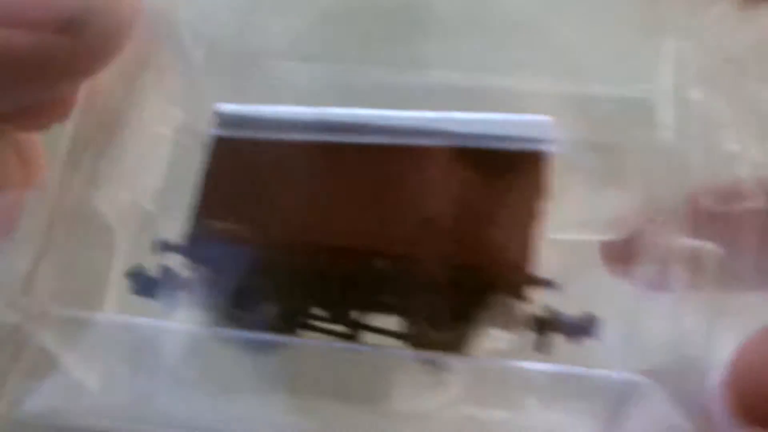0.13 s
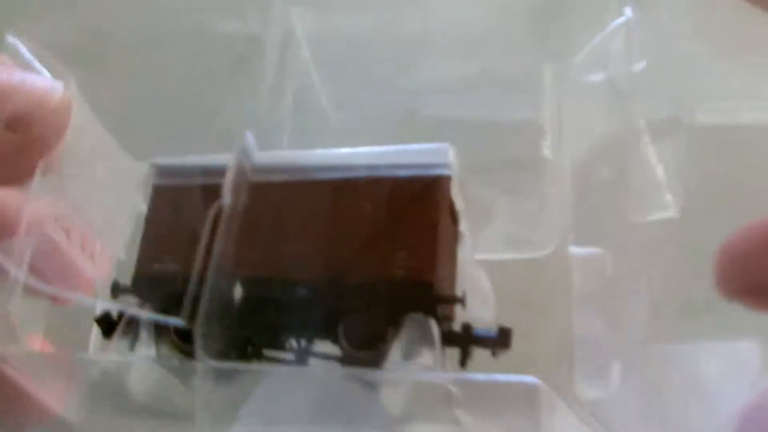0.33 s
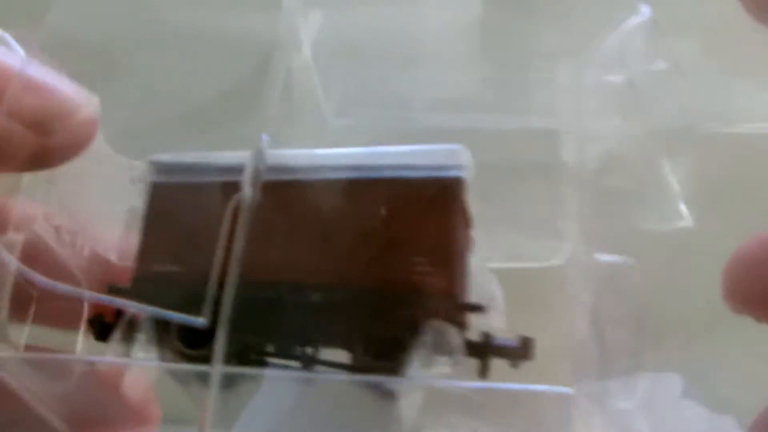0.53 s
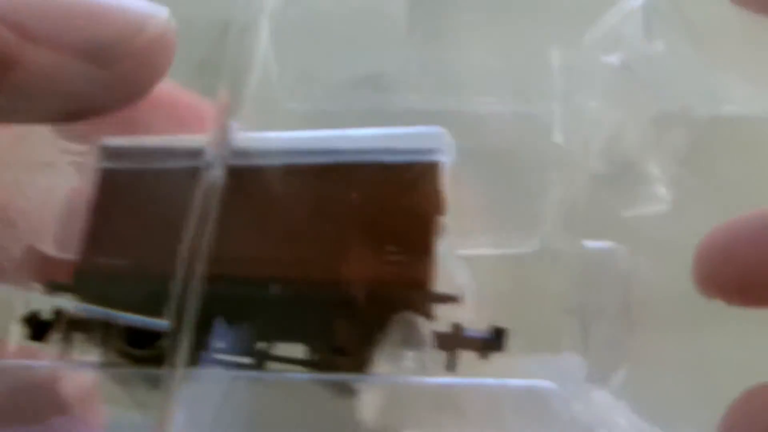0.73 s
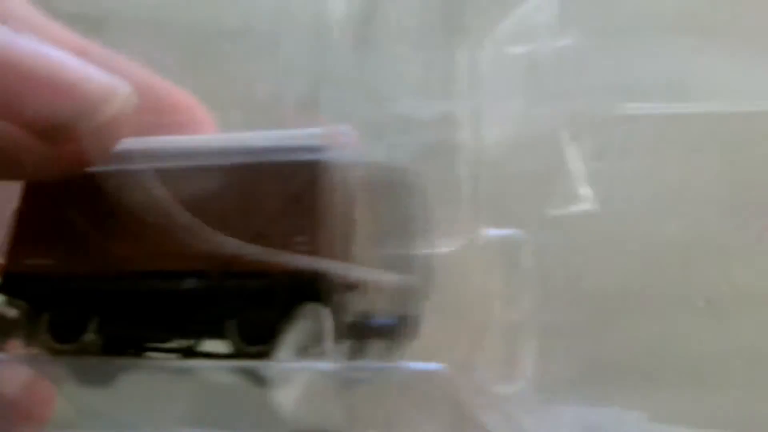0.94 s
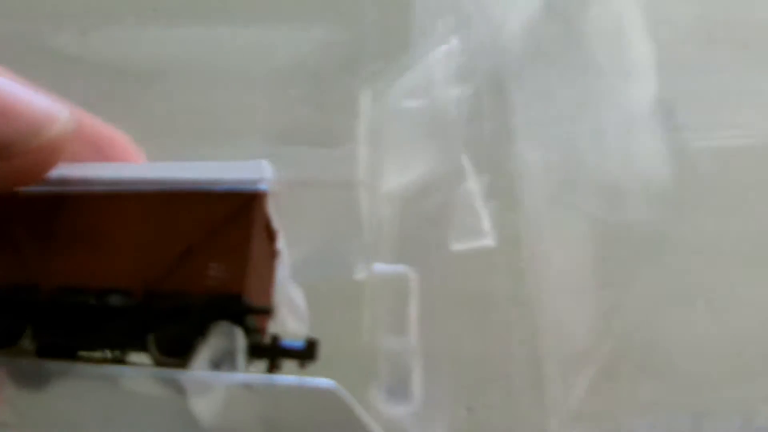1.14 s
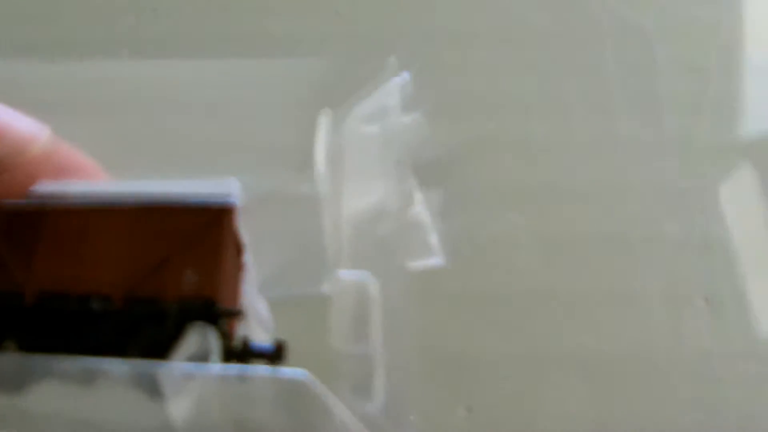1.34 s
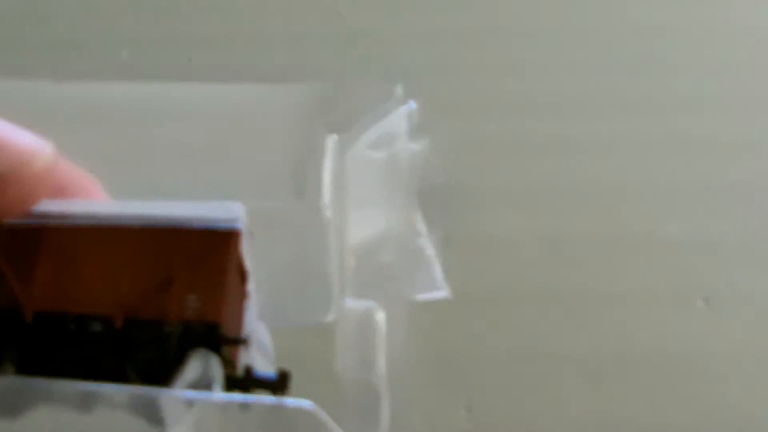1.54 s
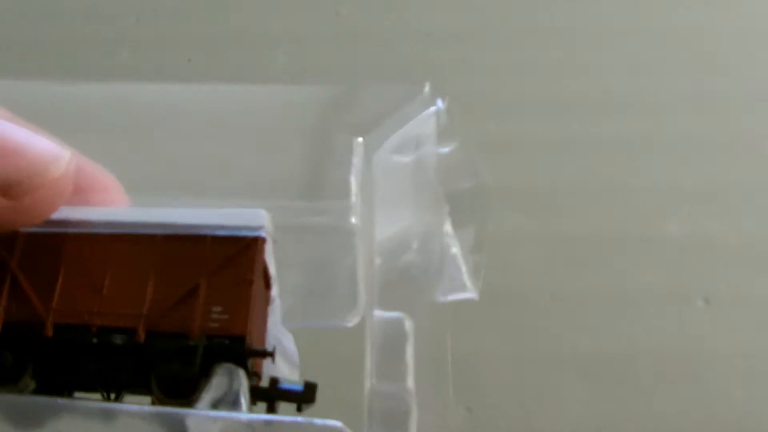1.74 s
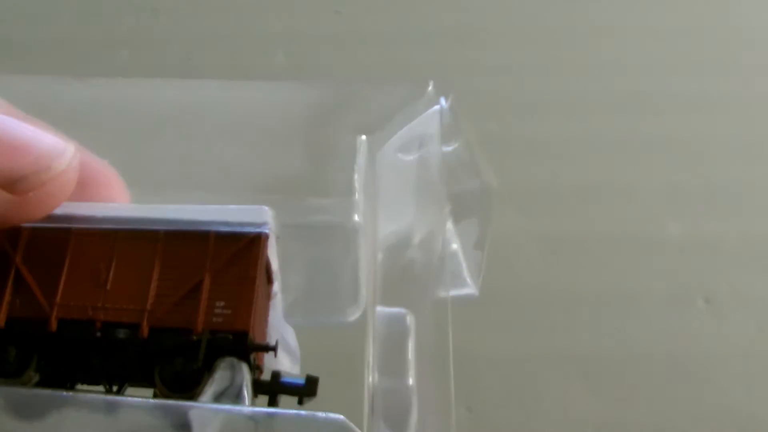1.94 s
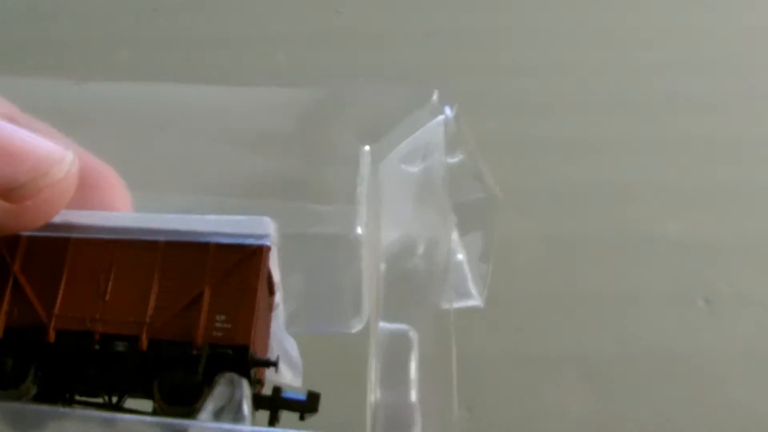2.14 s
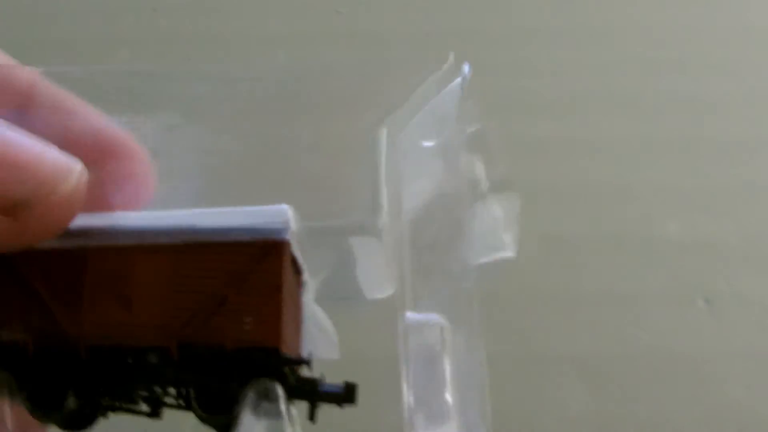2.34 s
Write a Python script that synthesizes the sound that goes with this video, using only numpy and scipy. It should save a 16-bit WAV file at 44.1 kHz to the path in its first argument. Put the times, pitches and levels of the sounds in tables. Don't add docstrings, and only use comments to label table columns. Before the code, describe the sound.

Thin plastic packaging handled very close to the microphone in a quiet small room: brief crinkles, two loud snaps, more creasing, a crackly jerky slide, faint taps, then the tray drops with a clack and is knocked softly.

```python
import sys
import numpy as np
from scipy import signal
from scipy.fft import rfft, irfft
from scipy.io import wavfile
from scipy.ndimage import uniform_filter1d

SR = 44100
rng = np.random.default_rng(int(sys.argv[2]) if len(sys.argv) > 2 else 0)


def log_audio(samples):
    frames = np.atleast_2d(samples).T
    limited = np.clip(frames, -1, 1)
    pcm = np.round(limited * 32767).astype(np.int16)
    wavfile.write(sys.argv[1], SR, pcm)


def natural_amplitude(level_db):
    exponent = np.asarray(level_db, float) / 20
    return 10 ** exponent


N = 110250


def evened(x):
    return x / np.sqrt(np.mean(x ** 2) + 1e-20)


def read(points, hz):
    point_hz, value = np.transpose(points)
    return np.interp(np.log(hz + 1), np.log(point_hz + 1), value)


def add(mix, start_s, sound):
    place = mix[round(start_s * SR):][:len(sound)]
    place += sound[:len(place)]


def causal(gain):
    size = 2 * len(gain) - 2
    cepstrum = irfft(np.log(np.maximum(gain, 1e-6)))
    cepstrum[1:size // 2] *= 2
    cepstrum[size // 2 + 1:] = 0
    return irfft(np.exp(rfft(cepstrum)))[:size // 2]


# pitch_hz, level_db (per Hz)
HISS_COLOUR = [(15, -55), (25, -32.5), (226, -9), (288, -9), (568, -7), (15200, -12.5), (16500, -27)]
# pitch_hz, likeness (0 to 1)
HISS_LIKENESS = [(60, 0.97), (380, 0.3), (2380, 0.09), (15000, 0.052)]


def hiss():
    hiss_db = -68
    hum_hz, hum_width_hz, hum_db = 121, 12, -9
    hz = np.fft.rfftfreq(N, 1 / SR)
    left, other = rfft(rng.standard_normal((2, N)))
    same = np.clip(read(HISS_LIKENESS, hz), 0, 1)
    right = same * left + np.sqrt(1 - same ** 2) * other
    hum = natural_amplitude(hum_db) / (1 + (2 * (hz - hum_hz) / hum_width_hz) ** 2)
    pair = irfft(np.array([left, right]) * (natural_amplitude(read(HISS_COLOUR, hz)) + hum), N)
    return natural_amplitude(hiss_db) * pair / np.sqrt(np.mean(pair.mean(0) ** 2))


# pitch_hz, time to fall 60 dB (s)
ROOM_RING = [(300, 0.3), (1500, 0.24), (6000, 0.3), (14000, 0.21)]


def room(x):
    first_echo_s, echo_gap = .004, 10
    out = np.zeros(N)
    turn = np.arange(N) / SR * 2 * np.pi * 45
    for fade in (np.sin(turn), np.cos(turn)):
        echoes = np.zeros(SR // 2)
        at = np.arange(round(first_echo_s * SR), SR // 2 - 20, echo_gap)
        at = at + rng.integers(0, echo_gap, len(at))
        echoes[at] = rng.choice([-1., 1.], len(at))
        hz, t, z = signal.stft(echoes, SR, nperseg=256)
        decay = natural_amplitude(-60 * t / read(ROOM_RING, hz)[:, None])
        tail = signal.istft(z * decay, SR, nperseg=256)[1]
        out += signal.fftconvolve(x * fade, tail / np.linalg.norm(tail))[:N]
    return out


# pitch_hz, side_minus_mid_db
PORT_DIFFERENCE = [(60, -6.5), (240, -29.5), (950, -26.5), (3770, -11.5), (15000, 0.5)]


def ports(x):
    colour = causal(natural_amplitude(read(PORT_DIFFERENCE, np.fft.rfftfreq(1024, 1 / SR))))
    turn = np.arange(N) / SR * 19
    out = np.zeros(N)
    for fade in (np.sin(turn), np.cos(turn)):
        smear = rng.standard_normal(400) * np.exp(-np.arange(400) / 70)
        smear = smear / np.linalg.norm(smear)
        out += signal.oaconvolve(x * fade, np.convolve(smear, colour))[:N]
    return out


# start_s, peak_db, pitch_hz
THUDS = [
    (0.065, -53.5, 139),
    (0.2208, -60, 71),
    (.296, -52.5, 200),
    (1.647, -53.5, 61),
    (1.934, -42, 235),
]


def thuds():
    swell_turns = 0.77
    out, t = np.zeros(N), np.arange(6000) / SR
    for start_s, peak_db, pitch_hz in THUDS:
        u = t * pitch_hz / swell_turns
        swell = u * np.exp(1 - u)
        add(out, start_s, natural_amplitude(peak_db) * np.sin(2 * np.pi * pitch_hz * t) * swell)
    return out


def body(part, bed_db, tilt_db, wander):
    colour, resonances = part
    hz = np.fft.rfftfreq(8192, 1 / SR)
    luck = wander * rng.standard_normal((14, 2))
    power = natural_amplitude(read(colour, hz) + bed_db) ** 2
    for (pitch_hz, level_db), (shift, lift) in zip(resonances, luck):
        centre_hz = pitch_hz * (1 + 0.038 * shift)
        width_hz = 50 + .075 * pitch_hz
        peak = natural_amplitude(level_db + 6 * lift) ** 2
        power = power + peak / (1 + (2 * (hz - centre_hz) / width_hz) ** 2) ** 1.3
    tilt = natural_amplitude(tilt_db * np.log2(np.clip(hz, 800, 11000) / 2000))
    return causal(np.sqrt(power) * tilt)


def bursts(rows, part, bed_db, wander):
    slips_per_s, spread_db, rise = 14000, 2, 0.17
    out, t = np.zeros(N), np.arange(1800) / SR
    for start_s, peak_db, length_s, tilt_db in rows:
        length_s = max(length_s, 1e-4)
        chance, size, sign = rng.random((3, len(t)))
        slips = (chance < slips_per_s / SR) * natural_amplitude(-spread_db * np.log(size + 1e-3)) * np.sign(sign - .5)
        shape = np.minimum(t / (rise * length_s) + 0.5, 1) * np.exp(-(t / length_s) ** 2)
        sound = signal.fftconvolve(slips * shape, body(part, bed_db, tilt_db, wander))
        add(out, start_s, natural_amplitude(peak_db) * sound / abs(sound).max())
    return out


# pitch_hz, level_db.
KNOCKS = [
    (1.9305, -33, 0.0059, 3),
    (1.934, -31.5, 0.0098, 1),
    (1.9435, -27.5, 0.0033, 1.5),
    (1.951, -34, 0.0035, 2.5),
    (1.961, -42, 0.0038, -2),
    (2.006, -68, 0.0016, 10),
]
BASE = [
    [(40, -56), (110, -32), (200, -18), (670, 1.5), (2500, -22), (10800, -37.5), (16500, -53)],
    [(236, 0), (388, 6), (673, -4), (829, -0.5), (1260, -6.5), (1680, -12), (2400, -17), (3810, -22)],
]


def knocks():
    return bursts(KNOCKS, BASE, -2.7, wander=0.21)


DROP = [
    (1.6457, -42, 0.0025, 0),
    (1.6488, -16, .002, -2),
    (1.651, -20, 0.0067, 0),
    (1.660, -29, 0.0058, 0),
    (1.668, -29, 0.002, -1.5),
    (1.680, -32.5, 0.005, -3.5),
    (1.695, -38.5, .003, 4.5),
    (1.731, -50, 0.0077, -4),
]
TRAY = [
    [(25, -30), (300, -6), (1680, -20), (2400, -17.5), (10100, -15.5), (16500, -38)],
    [(341, -10), (800, 2), (1220, -5), (1670, -1), (2050, -3), (3000, -16.5), (4200, -10.5), (9900, -11)],
]


def drop():
    return bursts(DROP, TRAY, 1, wander=0.33)


TAPS = [(.2082, -30, 0.0097, -1), (.375, -41.5, 0.004, 1), (1.088, -44.5, 0.0045, -5),
        (1.185, -54.5, 0.0042, 1), (1.488, -48, 0.0052, -3.5), (1.510, -45, 0.0084, -0.3),
        (1.520, -46.5, 0.0067, 1), (1.744, -40, 0.0042, 4.5), (1.811, -36.5, 0.036, 3.5),
        (1.827, -36.5, 0.0026, 7), (1.832, -39, 0.0058, -5), (2.068, -48.5, 0.0033, 0.5),
        (2.0995, -45.5, 0.0017, 0), (2.112, -49, 0.015, 4.5)]
RIM = [
    [(100, -32), (450, -9.5), (1170, -1), (4030, -12), (13300, -24), (16500, -55)],
    [(350, -18.5), (1150, 2.5), (1700, -1.5), (3930, -14)],
]


def taps():
    return bursts(TAPS, RIM, -7, wander=.5)


# pitch_hz, level_db
FLAP = [
    [(100, -27.5), (350, -3), (1200, -9), (3000, -12.5), (5000, -29.5), (16500, -45)],
    [(348, -8), (518, 1.5), (1110, -2.5), (2100, -4.5), (3100, -4.5)],
]
# start_s, level_db, fizz_db (bright fizz relative to the ring)
RUB = [
    [(.042, -53, -5.5), (.08, -42, -15.5), (.13, -55, -1), (.21, -59.5, -6)],
    [(.26, -49.5, 1.5), (.40, -69.5, -9.5), (.46, -47, -14.5), (.52, -69, -12), (.585, -51, -18),
     (.61, -67, -9), (.67, -57, -14), (.71, -61.5, -6), (.76, -58, -13)],
    [(.73, -58.5, -14), (.82, -50, -8.5), (.90, -52, -5.5), (1.005, -49, -9), (1.015, -52, -23),
     (1.07, -73, -14)],
    [(1.15, -70.5, -9), (1.58, -76, -1)],
    [(1.66, -51.5, -10), (1.72, -53, -3), (1.75, -54, -4), (1.79, -64.5, -18), (1.85, -59, -15.5),
     (1.915, -64, 14), (1.99, -65.5, -12), (2.05, -71.5, -15), (2.065, -70.5, -8), (2.19, -69, -10)],
]


def rub():
    slips_per_s, fizz_hz, fizz_width_hz = 14000, 8690, 3500
    t, out = np.arange(N) / SR, np.zeros(N)
    slips = (rng.random(N) < slips_per_s / SR) * rng.standard_normal(N)
    unsteady = evened(uniform_filter1d(rng.standard_normal(N), 260))
    slips = slips * natural_amplitude(2.2 * unsteady)
    hz = np.fft.rfftfreq(1024, 1 / SR)
    fizz_colour = causal(1 / (1 + ((hz - fizz_hz) / fizz_width_hz) ** 2))
    fizz = rng.standard_normal(N) * (1 + abs(uniform_filter1d(slips, 30)) * 8)
    fizz = evened(signal.oaconvolve(fizz, fizz_colour)[:N])
    parts, tilts_db = (SHEET, FLAP, SLEEVE, RIM, BASE), (-3.5, -0.66, -3.5, -1.0, 6.5)
    for stroke, part, tilt_db in zip(RUB, parts, tilts_db):
        start_s, level_db, fizz_db = np.transpose(stroke)
        ring = evened(signal.oaconvolve(slips, body(part, 1.5, tilt_db, 0))[:N])
        touch = np.clip(np.minimum(t - start_s[0], start_s[-1] - t) / 0.012, 0, 1)
        level = touch * natural_amplitude(np.interp(t, start_s, level_db))
        out += level * (ring + natural_amplitude(np.interp(t, start_s, fizz_db)) * fizz)
    return out


CRINKLES = [(.046, -46.5, 0.0059, -18), (.074, -37, 0.0085, 4.5), (.0912, -28, 0.0045, 0.5),
            (.0958, -25.5, 0.0076, 4), (.1366, -24.5, 0.002, 7), (.146, -32.5, 0.011, -0.5),
            (.1566, -28.5, 0.0012, 4.5), (.415, -38.5, 0.042, 1.5), (.4268, -23.5, 0.0019, -3),
            (.4295, -29, 0.0042, -3.5), (.436, -34, 0.0057, -0.5), (.4452, -26, 0.0037, -0.5)]
SHEET = [
    [(40, -55.5), (150, -25), (590, -15.5), (1600, 3), (2300, -4.5), (13500, -13), (16500, -40)],
    [(800, -4.5), (1150, 4.5), (1660, -1.5), (3240, -5.5), (4100, -12), (7700, -8)],
]


def crinkles():
    return bursts(CRINKLES, SHEET, -2.0, wander=0.48)


SLIPS = [(.486, -56, 0.0034, 5), (.547, -49.5, .003, 0), (.661, -41.5, 0.0025, 0.5),
         (.716, -44.5, 0.0035, -3), (.733, -55, .001, -2), (.7392, -40, 0.0037, -3.5),
         (.7542, -36, .005, 0.5), (.7755, -31, 0.0099, 2.8), (.800, -37.5, 0.0088, 2),
         (.814, -30.5, 0.012, 2), (.828, -28, 0.00077, -3), (.840, -23, 0.015, 0.1), (.845, -25, 0.0041, 8),
         (.8635, -39, 0.002, -3), (.877, -32.5, 0.0025, 0.5), (.8795, -24.5, 0.0048, 3),
         (.8875, -25.5, 0.0014, -6.5), (.891, -43, .003, -22), (.9045, -34, 0.0014, 3),
         (.907, -35.5, 0.0025, -6), (.912, -29, 0.0057, -2), (.9205, -30.5, 0.0022, -2),
         (.927, -29.5, 0.0043, 0), (.9345, -43, 0.0037, -14), (.9505, -29, 0.0078, -1),
         (.956, -31.5, 0.0048, -6), (.973, -30, 0.0068, -0.5), (.981, -29.5, 0.0042, -1),
         (.990, -35, .003, 4.5), (.995, -32.5, 0.0034, -4), (1.0002, -34, 0.0018, -1),
         (1.0135, -46, .001, 22), (1.030, -41.5, 0.0037, 8.5)]
SLEEVE = [
    [(40, -60), (120, -17), (300, -6), (1140, -8.5), (2760, -10), (12500, -16), (16500, -39.5)],
    [(800, 0), (1152, 1.5), (2100, 0.5), (3190, -16), (3650, 0.5), (6580, -13), (9800, -12)],
]


def slips_off():
    return bursts(SLIPS, SLEEVE, -2.5, wander=0.59)


SNAPS = [
    (.2228, 1.5, 0.0006, 3.5),
    (.2244, -14.5, 0.0016, 6),
    (.2265, -24.5, 0.015, -8),
    (.2338, -5, 0.0015, 1.5),
    (.2365, -10.5, 0.0021, -3),
    (.240, -24.5, 0.013, -3),
    (.246, -20, 0.0071, -2.5),
    (.2515, -20, 0.0047, -3.5),
    (.297, -32, 0.0015, -2.5),
]
CLASP = [
    [(30, -41.5), (590, -20), (1210, 1), (8090, -6), (10800, -4.5), (16500, -19)],
    [(1100, -7), (2150, -4), (2960, -2.5), (4740, -5), (6830, -3), (8840, -9), (10700, 1)],
]


def snaps_free():
    return bursts(SNAPS, CLASP, -6, wander=0.26)


def scene():
    room_db, snap_lean = -9.5, .34
    snaps = snaps_free()
    near = snaps + crinkles() + slips_off() + taps() + drop() + knocks() + rub() + thuds()
    into_room = signal.lfilter(*signal.butter(1, [120, 6500], "band", fs=SR), near)
    mid = near + natural_amplitude(room_db) * room(into_room)
    bright_snaps = signal.lfilter(*signal.butter(1, 2500, "high", fs=SR), snaps)
    side = ports(mid - .6 * snaps) + snap_lean * bright_snaps
    return np.array([mid + side, mid - side]) + hiss()


def low_pass(x):
    return signal.sosfilt(signal.butter(12, 16840, fs=SR, output="sos"), x)


def record(dry):
    band = signal.firwin(511, 16480, window=("kaiser", 9), fs=SR)
    mix = signal.oaconvolve(np.clip(dry, -1, 1), band[None], "same")
    return low_pass(mix)


dry = scene()
out = record(dry)
log_audio(out)
```